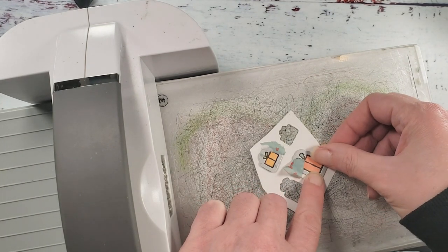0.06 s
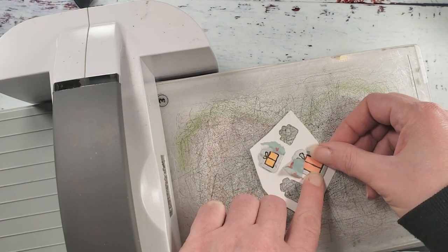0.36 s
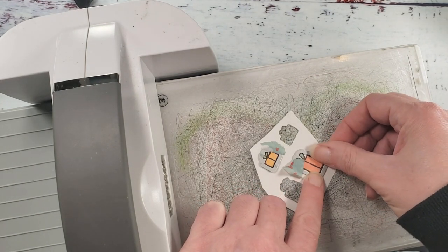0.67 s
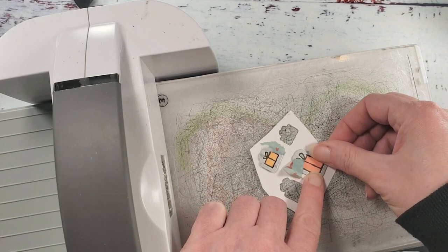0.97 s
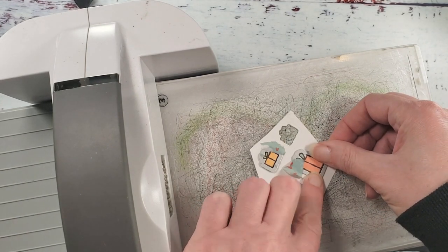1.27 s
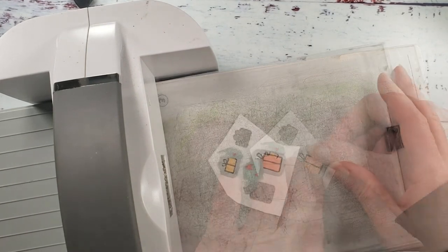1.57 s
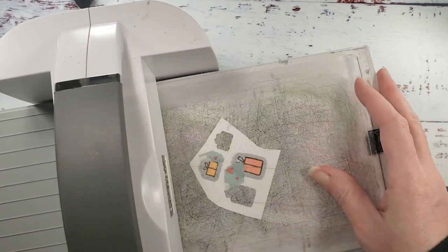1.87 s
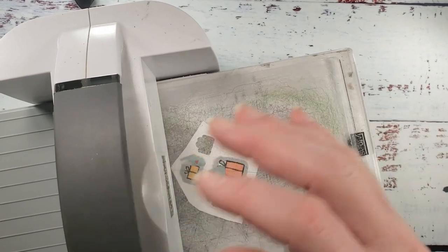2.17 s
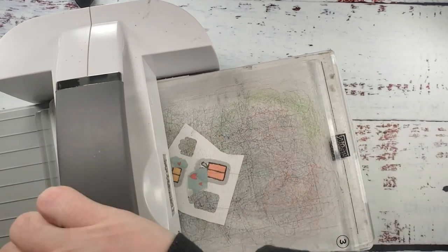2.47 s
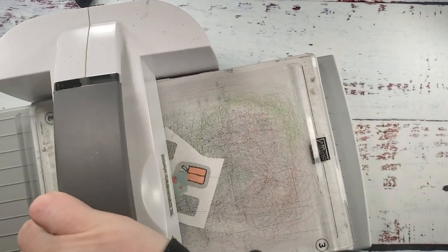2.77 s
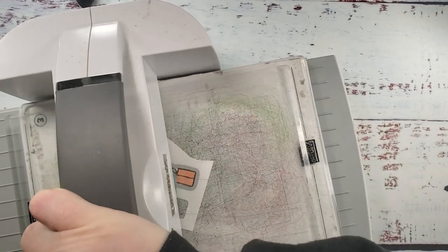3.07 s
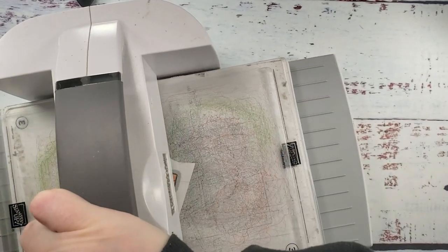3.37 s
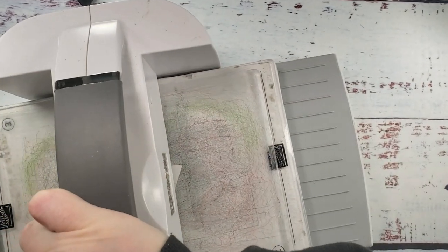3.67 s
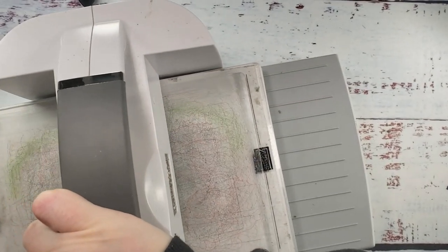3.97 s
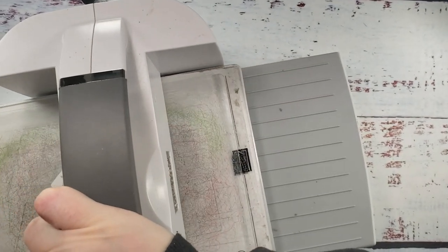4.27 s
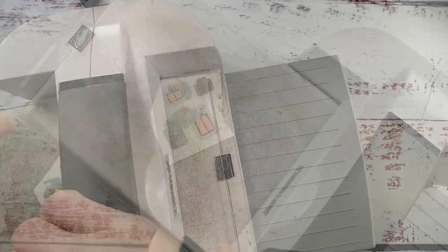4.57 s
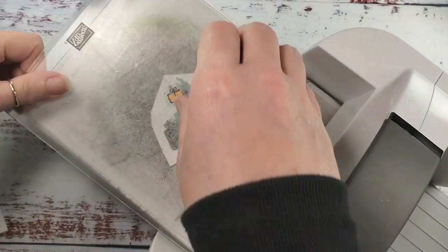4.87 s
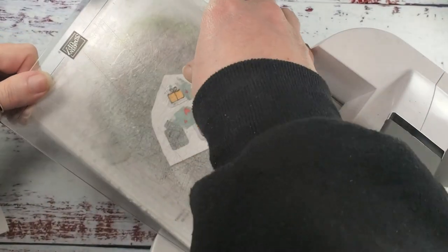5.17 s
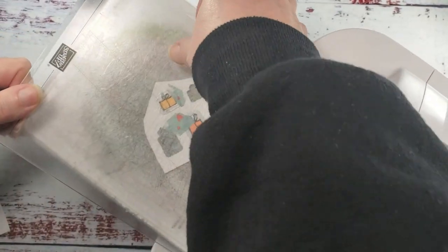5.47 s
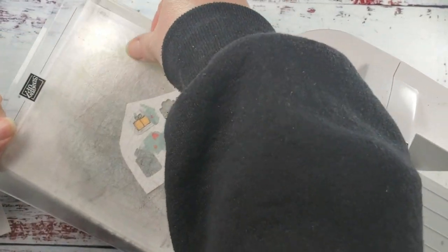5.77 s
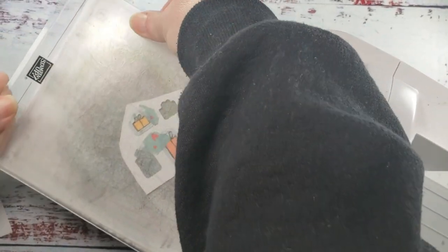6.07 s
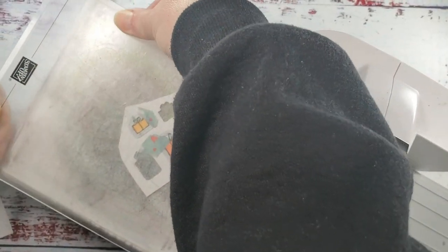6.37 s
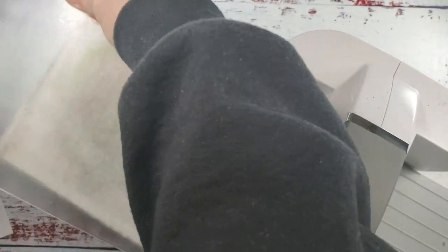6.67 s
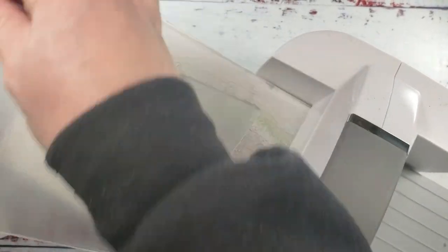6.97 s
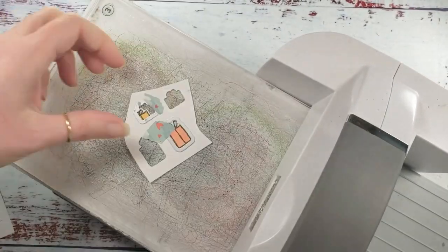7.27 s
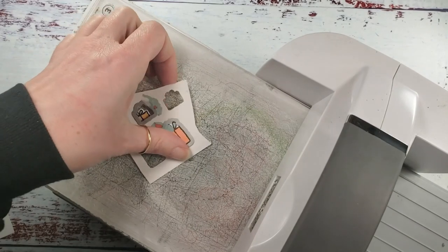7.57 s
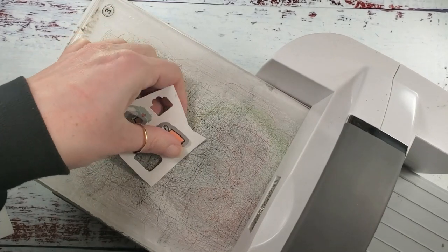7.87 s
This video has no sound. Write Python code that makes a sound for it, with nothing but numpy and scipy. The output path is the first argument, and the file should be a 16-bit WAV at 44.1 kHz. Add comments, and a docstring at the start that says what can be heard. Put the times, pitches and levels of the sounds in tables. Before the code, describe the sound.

Hands bump and rub faintly on a craft table, with a small tick near 0.9 seconds. From about 1.3 seconds a hand-cranked die-cutting machine pulls plastic plates through its rollers: a rough, uneven low rumble with grinding gears, creaks and scattered clicks, growing stronger near 3.9 seconds. A crack comes at 4 seconds, then at 4.2 the plates spring free with a loud, sharp clack that briefly rings the housing and shakes the table. A duller knock follows at 4.4, and the rumble fades by 4.8. Faint taps and rubbing lead to a tiny scratchy squeak near 5.9 as the top plate slides off. It knocks hard on the table twice in quick succession around 6.6 and 6.7 seconds. From 7 to 8 seconds fingers pick very softly at cut paper. Everything sounds close and slightly to the left, in a small quiet room.

```python
"""Hands bump faintly on a craft table in a small room; then a hand-cranked die-cutting machine draws
plastic plates through its rollers. Stick-slip friction makes the gears rumble and the plates creak with
the effort on the crank, until the plates spring from the nip with a clack that rings the housing's modes.
The top plate slides off with a squeak and knocks twice on the table, and fingers pick at the cut paper."""
import sys
import numpy as np
from scipy import signal
from scipy.fft import rfft, irfft, next_fast_len
from scipy.io import wavfile
from scipy.ndimage import map_coordinates

SR = 44100
rng = np.random.default_rng(int(sys.argv[2]) if len(sys.argv) > 2 else 0)


def transcribe(u):
    """Save the signal u as a 16-bit wav file named by the first command-line argument.

    u: samples, shape (n,) or (channels, n), limited to [-1, 1]; the rate is SR.
    q: integer samples, one column per channel.
    """
    v = np.clip(np.atleast_2d(u).T, -1, 1)
    q = np.round(v * 32767).astype(np.int16)
    wavfile.write(sys.argv[1], SR, q)


N = 358533

# coherence of the left and right channels: f/Hz, correlation
COHERENCE = [(30, .3), (70, 0.45), (130, 0.68), (280, 0.73), (600, 0.82), (2000, 0.17), (8000, 0.062)]
# spectra of the rumbling table and of white noise: f/Hz, level/dB
TABLE_RUMBLE = [(18, -37.5), (30, -8), (54, 1.5), (108, -1), (129, -0.5), (161, -16), (200, -14),
                (260, -43), (440, -120)]
WHITE = [(100, 0), (3000, 0)]


def amp(db):
    """Amplitude ratio of a level in decibels."""
    return 10 ** (np.asarray(db) / 20)


def unit(x):
    """Normalisation to rms 1."""
    return x / np.sqrt(np.mean(x ** 2) + 1e-20)


def along(points, hz):
    """Interpolation of (f/Hz, value) points on a logarithmic frequency axis."""
    f, v = np.transpose(points)
    return np.interp(np.log(hz + 1), np.log(f + 1), v)


def wobble(rate):
    """Smooth random modulation within +-1, with rate knots a second."""
    knots = rng.standard_normal(int(N * rate / SR) + 4)
    return np.tanh(map_coordinates(knots, [np.arange(N) * rate / SR]))


def filtered(x, response):
    """Linear filtering: the spectrum is multiplied by a frequency response."""
    n = x.shape[-1]
    m = next_fast_len(n + SR // 8)
    return irfft(rfft(x, m) * response(np.fft.rfftfreq(m, 1 / SR)), m)[..., :n]


def spread(pair, spectrum):
    """Partial coherence: two independent signals, as mid and side, make coloured stereo of rms 1."""
    def response(hz):
        angle = np.arccos(np.clip(along(COHERENCE, hz), -1, 1)) / 2
        return amp(along(spectrum, hz)) * [np.cos(angle), np.sin(angle)]
    mid, side = filtered(pair, response)
    return unit(np.array([mid + side, mid - side]))


def noise(spectrum, n=N):
    """Gaussian stereo noise of a given spectrum."""
    return spread(rng.standard_normal((2, n)), spectrum)


def slips(rate, uneven):
    """Stick-slip as a Poisson process: impulses of uneven size, on average rate a second."""
    sizes = np.exp(uneven * rng.uniform(-1.8, 1, N)) * rng.choice([-1, 1], (2, N))
    return unit((rng.random(N) < rate / SR) * sizes)


def placed(pan_db):
    """Panning by level difference, left minus right."""
    return amp([[pan_db / 2], [-pan_db / 2]])


def add(track, s, sound):
    """Superposition of a sound on the track at s seconds."""
    part = track[:, round(s * SR):][:, :sound.shape[1]]
    part += sound[:, :part.shape[1]]


def room(x, wet_db):
    """Reverberation: an exponentially decaying diffuse field follows the direct sound."""
    # reverberation time: f/Hz, t60/s
    decay_times = [(60, 0.27), (250, .4), (1000, 0.49), (4000, 0.49), (8000, 0.31), (16000, 0.36)]
    hz, t, field = signal.stft(noise(WHITE, SR // 2), SR, nperseg=256)
    field = field * amp(-60 * t / along(decay_times, hz)[:, None]) * (1 - np.exp(-t / 0.006))
    tail = signal.istft(field, SR, nperseg=256)[1]
    tail /= np.linalg.norm(tail[0])
    return x + amp(wet_db) * signal.fftconvolve(x, tail, axes=1)[:, :x.shape[1]]


def room_tone():
    """Stationary noise: the faint, mostly low background of the room."""
    # f/Hz, level/dB
    background = [(13, -40), (22, -7), (59, -1.5), (118, -5), (189, -14.5), (496, -27.5), (730, -26.5),
                  (837, -25.5), (1810, -36), (2590, -27.5), (3150, -34), (8030, -40), (12100, -33.5),
                  (13600, -50.5), (16000, -51.5)]
    return amp(-74.5) * noise(background)


def hands():
    """Forced vibration and friction: hands rock the table, rub the plates together and brush paper."""
    # rocking of the table: t/s, level/dB
    leaning = [(0, -80.5), (.3, -69.5), (.65, -70), (4.9, -68), (6.2, -72), (7.45, -71), (7.8, -76),
               (8.13, -76.5)]
    # t/s, half length/s, plate rubbing level/dB, paper and sleeve rustle level/dB
    strokes = [(1.07, 0.28, -77, -91.5), (1.34, 0.028, -60, -71), (4.98, 0.11, -86, -77.5),
               (5.37, 0.16, -72, -94), (5.69, 0.23, -74.5, -73.5), (6.247, 0.053, -60, -81),
               (6.468, 0.12, -66, -84), (7.002, 0.1, -71, -83.5), (7.35, .12, -85, -89.5),
               (7.468, 0.032, -74, -96), (7.917, 0.28, -77, -78.5)]
    # friction spectra of plate and paper: f/Hz, level/dB
    rub_spectrum = [(110, -40), (180, 3.5), (200, -17), (254, 4), (335, -6), (426, -7.5), (594, -13),
                    (674, -6.5), (765, -13.5), (962, -7), (1130, -16.5), (1830, -13.5), (2800, -24.5),
                    (3640, -53.5), (6160, -120)]
    rustle_spectrum = [(1410, -16.5), (2400, -2), (2970, -5.5), (3380, -1.5), (4080, -2), (5140, -5.5),
                       (5520, -8), (7180, -7.5), (8280, -22), (13500, -10), (16000, -20)]
    t = np.arange(N) / SR
    rub, rustle = amp(-88.5), 0  # resting hands still rub a little
    for s, half, rub_db, rustle_db in strokes:
        swell = np.exp(-((t - s) / half) ** 2)
        rub += amp(rub_db) * swell
        rustle += amp(rustle_db) * swell
    bumping = amp(np.interp(t, *np.transpose(leaning)) + 5.5 * wobble(13)) * noise(TABLE_RUMBLE)
    rubbing = amp(-2.5 + 1.5 * wobble(32)) * rub * spread(slips(2000, uneven=0.29), rub_spectrum)
    rustling = amp(4 + 2 * wobble(30)) * rustle * spread(slips(5000, uneven=0.31), rustle_spectrum)
    return placed(-4) * (bumping + rubbing + rustling)


def cracks():
    """Sudden stress release in plastic or paper excites a broad resonance within one cycle."""
    # t/s, level/dB, centre f/Hz, left minus right/dB, t60/s
    releases = [(0.819, -67.5, 5160, -9.5, 0.047), (0.885, -41, 6200, -8.5, 0.015),
                (0.885, -56.5, 1580, -9, 0.025), (2.064, -47.5, 3800, -9, 0.039),
                (2.168, -52.5, 3700, -6, 0.11), (2.478, -53, 4760, -5, 0.046),
                (3.411, -37, 1230, -5, 0.032), (3.519, -37.5, 726, -7.5, 0.027),
                (3.901, -52, 5070, -4.5, 0.053), (3.922, -33.5, 1290, -1.5, 0.021),
                (4.026, -20, 1500, -4.5, 0.01), (4.025, -28, 4700, -4.5, 0.014),
                (4.159, -32, 4500, -12.5, 0.12), (4.409, -19, 412, 4, 0.022), (4.408, -26, 950, -1, 0.017),
                (4.434, -41, 6200, -8, 0.046), (6.585, -39, 910, 14, 0.03), (7.702, -61, 1560, -2, 0.039)]
    track, t = np.zeros((2, N)), np.arange(SR // 2) / SR
    for s, db, hz, pan_db, t60 in releases:
        resonance = [(hz / 6, -26), (hz / 1.4, -7), (hz, 0), (hz * 1.4, -9), (hz * 2, -24),
                     (hz * 8, -55), (hz * 30, -90)]
        envelope = amp(db - 60 * t / t60) * (1 - np.exp(-2 * hz * t))
        add(track, s, placed(pan_db) * room(envelope * noise(resonance, len(t)), wet_db=-16.5))
    return track


def drags():
    """Sliding friction of fingers, paper and plates swells and fades around one resonance a stroke; the swell
    at 1.54 s near 4.2 kHz instead rings on after the knock at 1.48 s."""
    # t/s, level/dB, half length/s, centre f/Hz, offset to -14 dB/Hz
    strokes = [(1.098, -81, 0.48, 1520, 400), (1.151, -86, .15, 2900, 500), (1.16, -78, .035, 14000, 3000),
               (1.33, -67, .025, 2000, 900), (1.36, -79, 0.062, 13500, 3500),
               (1.541, -63, 0.049, 4200, 1300), (2.01, -42.5, 0.013, 760, 199),
               (2.303, -70.5, 0.12, 13300, 3550), (3.373, -55, 0.045, 1030, 550),
               (3.531, -56, 0.015, 1360, 500), (3.578, -54, 0.0082, 606, 300),
               (4.73, -74, 0.046, 2650, 350), (5.179, -63.5, 0.0076, 2008, 400),
               (5.301, -68, .012, 1450, 300), (5.369, -59.5, .012, 850, 300),
               (7.447, -65.5, 0.012, 1300, 500), (5.867, -67.5, 0.053, 1800, 199.5),
               (6.584, -51, 0.0091, 520, 300.7), (6.226, -59.5, 0.042, 330, 110.7),
               (6.256, -70, 0.048, 1848, 159.7), (7.38, -81, 0.13, 13800, 3510),
               (7.879, -72, 0.14, 1719, 230), (7.917, -67.5, 0.058, 3860, 1110),
               (8.038, -73, 0.032, 13400, 3000)]
    track, t = np.zeros((2, N)), np.arange(SR // 2) / SR
    middle = t[-1] / 2
    for s, db, half, hz, width in strokes:
        resonance = [(hz / 3, -60), (hz - width, -14), (hz, 0), (hz + width, -14), (hz * 3, -60)]
        swell = amp(db) * np.exp(-((t - middle) / half) ** 2)
        add(track, s - middle, swell * noise(resonance, len(t)))
    return room(track, wet_db=-7.5)


def impacts(rows, modes, *, pan_db, wet_db, t60, hard_rise_s, light_rise_s, damping, ring_db,
            knock_gain_db, clack_gain_db, snap_gain_db, fizz_gain_db,
            thud_gain_db, thud_t60, thud_rise_s, rebound_s, rebound_db):
    """Impact excitation: plastic strikes and rebounds, its modes ring and the table thuds below."""
    # spectra of the contact noise, from low to high: f/Hz, level/dB
    thud_band = [(25, -28.5), (55, -8.5), (80, 1.5), (125, 4), (180, -13), (300, -37.5), (600, -79)]
    knock_band = [(100, -41.5), (190, -11), (280, 2.5), (390, -3), (500, -7.5), (800, -21.5), (2000, -70)]
    clack_band = [(250, -32.5), (480, -9.5), (800, -0.5), (1100, 1), (1400, -1), (1800, -2.5), (2200, -5.5),
                  (2900, -17.5), (4000, -27), (9000, -67.5)]
    snap_band = [(1500, -46), (2500, -0.5), (4000, -1), (5400, -5.5), (7200, -7.5), (8000, -21),
                 (11000, -27.5), (16000, -34)]
    fizz_band = [(6000, -39), (8500, -4.5), (11000, -2.5), (13000, 0.5), (16000, -1.5)]
    track, t = np.zeros((2, N)), np.arange(SR * 2 // 3) / SR

    def burst(spectrum, t60, attack):
        """A contact and its rebound add in power, with the energy of a decay that starts at rms 1."""
        contact = lambda age: amp(-60 * age / t60) * (1 - np.exp(-age / attack))
        envelope = np.hypot(contact(t), amp(rebound_db) * contact(np.maximum(t - rebound_s, 0)))
        return unit(noise(spectrum, len(t)) * envelope) * np.sqrt(t60 / t[-1] / np.log(1e6))

    octaves = np.log2(np.array([300, 1200, 4200]) / 584)  # hardness tilts the spectrum about 584 Hz
    strongest_db = max(row[1] for row in rows)
    for s, db, hardness, thud_db in rows:
        knock_db, clack_db, snap_db = db + hardness * octaves + [0, 0, -8.5]
        relative_db = db - strongest_db
        rise = np.interp(relative_db, [-30, 0], [light_rise_s, hard_rise_s])
        rise += 0.0003 * max(-hardness, 0)  # a soft contact slows the attack
        drive = [(280, knock_db), (900, clack_db), (2000, clack_db), (4000, snap_db)]
        ring = 0
        for hz, level, mode_t60 in modes:
            phase_scatter = np.arccos(np.clip(along(COHERENCE, hz), 0, 1)) / 2  # between the channels
            phase = rng.uniform(0, 2 * np.pi) + rng.normal(0, phase_scatter, (2, 1))
            mode_db = level + along(drive, hz) + rng.normal(0, 1)
            ring += amp(mode_db - 60 * t / mode_t60) * np.sin(2 * np.pi * hz * t + phase)
        ring *= amp(ring_db + damping * relative_db) * (1 - np.exp(-t / rise))  # light blows ring less
        hit = amp(clack_db + clack_gain_db) * burst(clack_band, t60, rise)
        hit += amp(snap_db + snap_gain_db) * burst(snap_band, 0.88 * t60, 0.43 * rise)
        hit += amp(snap_db + fizz_gain_db + 0.28 * relative_db) * burst(fizz_band, 1.1 * t60, 0.98 * rise)
        hit += amp(knock_db + knock_gain_db) * burst(knock_band, 1.4 * t60, 3 * rise)
        thud = amp(thud_db + thud_gain_db) * burst(thud_band, thud_t60, thud_rise_s)
        add(track, s, room(hit, wet_db) + ring + thud)
    return placed(pan_db) * track


def machine_jolts():
    """Jolts excite the normal modes of the housing, most strongly as the plates leave the nip."""
    # t/s, level/dB, hardness/(dB per octave), table thud level/dB
    jolts = [(1.304, -58, -1, -58), (1.367, -61, -1.5, -55.5), (1.48, -44.5, 3.5, -41.5),
             (1.542, -48, -5, -49), (1.578, -58, 1.5, -44), (1.737, -54, 1.5, -67), (1.95, -52, -1, -50.5),
             (1.998, -43.5, -0.5, -53), (2.064, -52.5, 0, -46), (2.146, -51, -0.5, -52),
             (2.208, -50, -1, -53), (2.415, -58, 0, -66), (2.464, -52.5, 0.5, -51), (2.593, -53, 1.5, -49),
             (2.799, -59, 1, -46), (2.872, -58, -4.5, -62), (2.987, -54, -1, -55), (3.019, -55.5, 0, -47),
             (3.175, -56, -11, -47), (3.298, -58.5, -6.5, -38.5), (3.393, -58, -10, -55),
             (3.411, -53.5, -1.5, -44), (3.518, -52, -1.5, -62), (3.571, -55.5, -2, -40.5),
             (3.73, -53.5, -3.5, -39), (3.782, -62, 0, -63), (3.858, -52, -3, -40),
             (3.921, -50.5, -4.5, -47), (3.966, -54, -4.5, -43), (4.169, -22.5, 2.5, -36.5),
             (4.379, -38, -1, -44), (4.406, -46, -1, -38.5), (4.47, -50, -1.5, -39), (4.532, -54, 1.5, -62),
             (4.622, -47, -3, -61), (4.8, -66.5, -4.5, -50)]
    # f/Hz, level/dB, t60/s
    housing_modes = [(126.6, -4.5, 0.48), (251.3, 4, 0.25), (391, -7.5, 0.33), (688, -13, 0.25),
                     (850, -10, 0.091), (1066, -2, 0.18), (1379, -5.5, .12), (1543, -12.5, 0.17),
                     (1728, -7, .2), (1853, -8, 0.17), (2310, -12.5, 0.15), (2596, -14, .2),
                     (3100, -20, .3), (3924, -10, .2), (4441, -17.5, .15), (5243, -15, .15)]
    return impacts(jolts, housing_modes, pan_db=-4, wet_db=-7, t60=0.059,
                   hard_rise_s=0.0017, light_rise_s=0.0008, damping=0.2, ring_db=-1,
                   knock_gain_db=4.5, clack_gain_db=5, snap_gain_db=8, fizz_gain_db=-4,
                   thud_gain_db=4, thud_t60=0.17, thud_rise_s=0.0069, rebound_s=0.028, rebound_db=-14.5)


def effort(rows, fade_s):
    """Amplitude envelope of one spell of cranking, faded in and out."""
    t = np.arange(N) / SR
    s, db = np.transpose(rows)
    gate = np.clip(1 + np.minimum(t - s[0], s[-1] - t) / fade_s, 0, 1)
    return gate * amp(np.interp(t, s, db))


def crank():
    """Amplitude modulation: the gains of rumble, grinding and scrape follow the effort on the crank."""
    # effort with the plates in the nip, then running free: t/s, level/dB
    in_nip = [(1.31, -59), (1.45, -58), (1.6, -55), (1.89, -62), (2.1, -57.5), (2.39, -63), (2.51, -54),
              (2.72, -60), (3.1, -61), (3.34, -57.5), (3.47, -59.5), (3.56, -59.5), (3.66, -62),
              (3.87, -50), (4.02, -53), (4.14, -59.5)]
    run_out = [(4.33, -51), (4.5, -55), (4.72, -63), (4.84, -68)]
    pull, free = effort(in_nip, fade_s=0.0091), effort(run_out, fade_s=0.018)
    drawn_in_s = np.arange(N) / SR - in_nip[0][0]
    rumble = pull * amp(3.5 + 3 * drawn_in_s) + free * amp(11.5)  # the table takes a growing load
    scrape = pull * amp(-15.5) + free * amp(-7.5)
    return rumble, pull + free, scrape


def rollers():
    """Stick-slip under load: gears and rollers ring the frame, the table rumbles, the plates scrape."""
    # resonances of gear train and frame: f/Hz, bandwidth/Hz, level/dB
    frame_modes = [(265.7, 17, 5.5), (372, 28, 2), (588.4, 45, -4), (699, 28, 5), (826, 120, -6.5),
                   (1041, 87, -8), (1222, 53, -9.5), (1830, 160, -19)]
    # friction spectra of gears and plates: f/Hz, level/dB
    grind_spectrum = [(100, -32), (170, -3.5), (250, 3.5), (501, -3), (685, -1.5), (763, -17),
                      (1070, -12.5), (1440, -22), (1750, -21), (3000, -25.5), (3900, -60), (6600, -120)]
    scrape_spectrum = [(1290, -35.5), (2200, -2.5), (2470, -1), (2730, -15), (3020, -7.5), (3530, -15.5),
                       (4100, -9), (6920, -13), (8030, -19), (9170, -22), (12200, -13.5), (14200, -14),
                       (16000, -16.5)]

    def frame(f):
        """Damped resonators summed with alternating sign."""
        return sum((-1) ** k * amp(db) * 1j * f * width / (hz * hz - f * f + 1j * f * width)
                   for k, (hz, width, db) in enumerate(frame_modes))

    rumble, grind, scrape = crank()
    load = amp(3.2 * wobble(24))  # the hand never turns quite evenly
    teeth = spread(slips(320, uneven=0.97), WHITE)
    ringing = amp(-4.5) * unit(filtered(teeth, frame))
    grit = amp(-2) * unit(room(spread(slips(600, uneven=0.29), grind_spectrum), wet_db=1))
    scraping = amp(2) * unit(room(spread(slips(550, uneven=0.5), scrape_spectrum), wet_db=3.5))
    rumbling = amp(-1 + 3 * wobble(13)) * rumble * noise(TABLE_RUMBLE)
    return placed(-3) * (rumbling + load * (grind * (ringing + grit) + scrape * scraping))


def creaks():
    """Sparse stick-slip: the squeezed plates creak, more strongly as the effort grows."""
    # f/Hz, level/dB
    spectrum = [(400, -25.5), (750, 6), (1400, -4.5), (2400, -7.5), (4500, -17), (7000, -18),
                (10000, -45)]
    _, grind, scrape = crank()
    t = np.arange(SR // 50) / SR
    chatter = rng.standard_normal((2, len(t))) * amp(-60 * t / 0.028)
    ticks = signal.fftconvolve(slips(28, uneven=0.59), chatter, axes=1)[:, :N]
    return placed(-10) * amp(-7) * np.sqrt(grind * scrape) * room(spread(ticks, spectrum), wet_db=0)


def shudder():
    """Damped free vibration: released from the plates, the machine shakes on the table."""
    release_s, rise_s, t60 = 4.14, 0.023, 0.66
    t = np.maximum(np.arange(N) / SR - release_s, 0)
    return placed(-3.5) * amp(-29.5 - 60 * t / t60) * (1 - np.exp(-t / rise_s)) * noise(TABLE_RUMBLE)


def plate_knocks():
    """The loose plate rings in its normal modes as it touches and lands on the table."""
    # t/s, level/dB, hardness/(dB per octave), table thud level/dB
    touches = [(4.954, -66.5, 3, -73), (5.157, -63.5, 0, -66), (5.195, -71, 1, -61.5),
               (5.305, -68.5, -4, -68), (5.365, -63, -1.5, -68), (5.455, -68, 0, -78), (5.529, -66, 2, -75),
               (6.396, -61.5, -2, -51), (6.599, -32.5, 2.5, -39.5), (6.714, -36.5, 1.5, -32.5),
               (6.732, -44, -0.5, -50), (6.752, -46, 0.5, -55), (6.997, -65, -4, -81),
               (7.048, -62.5, -0.5, -77), (7.44, -67.5, -2, -54), (7.535, -75, 1, -73)]
    # f/Hz, level/dB, t60/s
    plate_modes = [(279, 3, 0.166), (400, -3, .17), (544, -0.5, 0.18), (680.5, 4, 0.12), (965, 1, 0.1),
                   (1173, -14, 0.092), (1560, -17, 0.12), (1820, 0.5, 0.12), (2450, -7, 0.11),
                   (3140, -26, 0.22), (3350, -23, 0.23), (4630, -20, 0.28)]
    return impacts(touches, plate_modes, pan_db=-3.5, wet_db=-7.5, t60=0.067,
                   hard_rise_s=0.0009, light_rise_s=0.0031, damping=0.099, ring_db=-2.5,
                   knock_gain_db=6, clack_gain_db=6.5, snap_gain_db=8, fizz_gain_db=6,
                   thud_gain_db=2, thud_t60=0.32, thud_rise_s=0.0025, rebound_s=0.0186, rebound_db=-5)


def squeak():
    """Nearly periodic stick-slip: the sliding plate gives scratchy harmonic chirps of falling pitch."""
    # t/s, level/dB, fundamental f/Hz
    chirps = [(5.83, -71, 864), (5.846, -57.5, 950), (5.863, -64, 772)]
    half_s, fall_octaves_per_s = 0.01, 38
    harmonics_db = [-2.5, 3, -6.5, -5.5, -16, -13, -18, -23]
    track, t = np.zeros((2, N)), np.arange(SR // 20) / SR
    middle = t[-1] / 2
    swell = np.exp(-((t - middle) / half_s) ** 2)
    for s, db, hz in chirps:
        jitter = 1 + 0.09 * wobble(900)[:len(t)]
        pitch = hz * 2 ** (fall_octaves_per_s * (middle - t)) * jitter
        phase = 2 * np.pi * np.cumsum(pitch) / SR
        tone = sum(amp(level) * np.sin(k * phase) for k, level in enumerate(harmonics_db, 1))
        add(track, s - middle, placed(-12.5) * amp(db) * swell * tone)
    return room(track, wet_db=-8.5)


def scene():
    """Superposition of machine, plate and hands on the quiet of the room."""
    knocking = machine_jolts() + plate_knocks()
    cranking = rollers() + creaks() + shudder()
    handling = hands() + drags() + squeak()
    return knocking + cranking + handling + cracks() + room_tone()


def record(dry):
    """Band limiting: a steep low-pass filter cuts off at 15.9 kHz."""
    return signal.sosfilt(signal.cheby1(N=12, rp=0.2, Wn=15900, fs=SR, output="sos"), dry)


dry = scene()
out = record(dry)
transcribe(out)
```